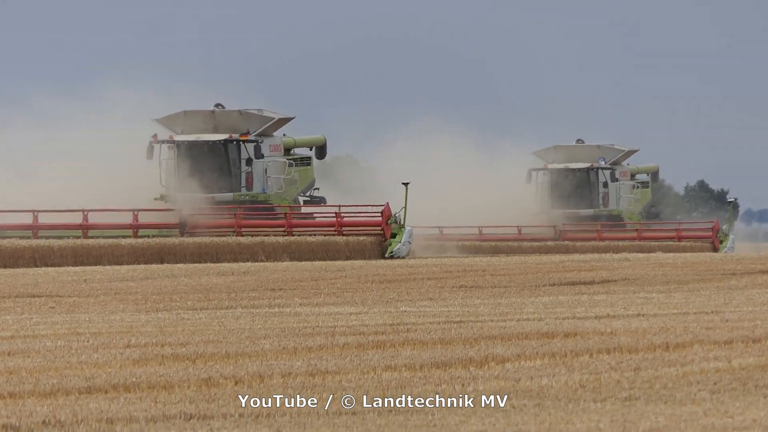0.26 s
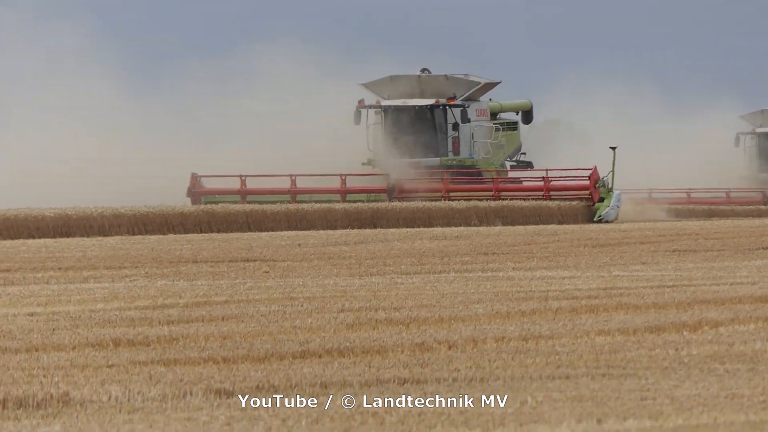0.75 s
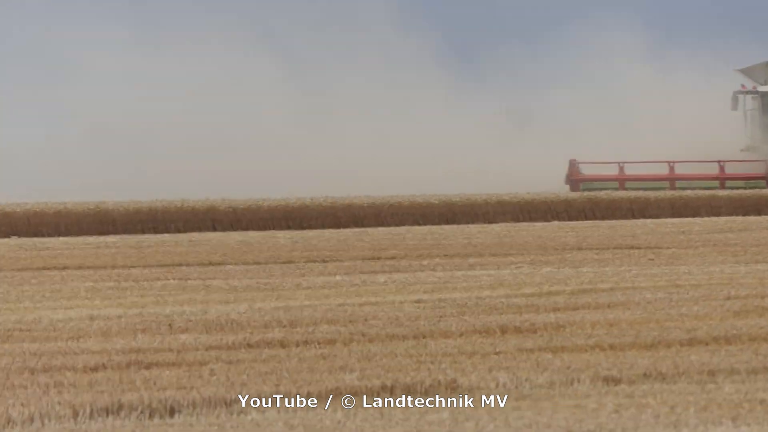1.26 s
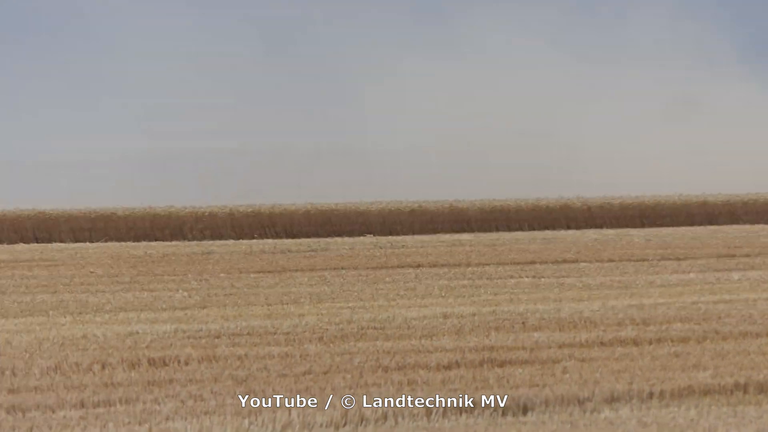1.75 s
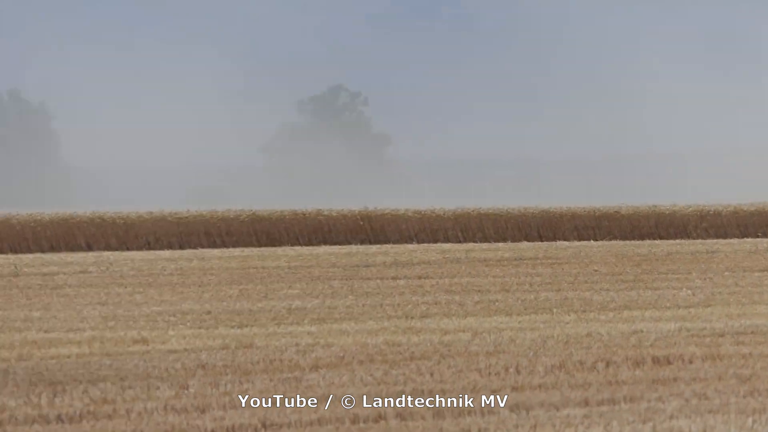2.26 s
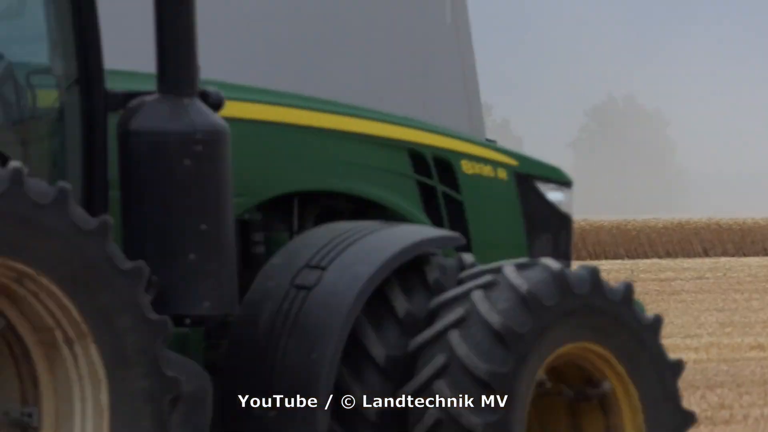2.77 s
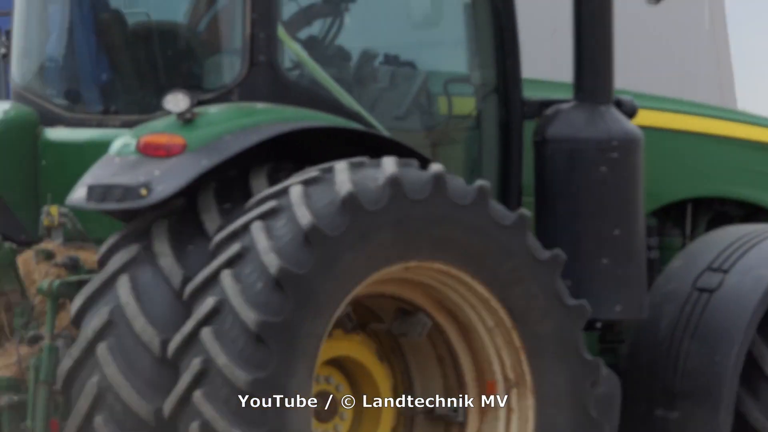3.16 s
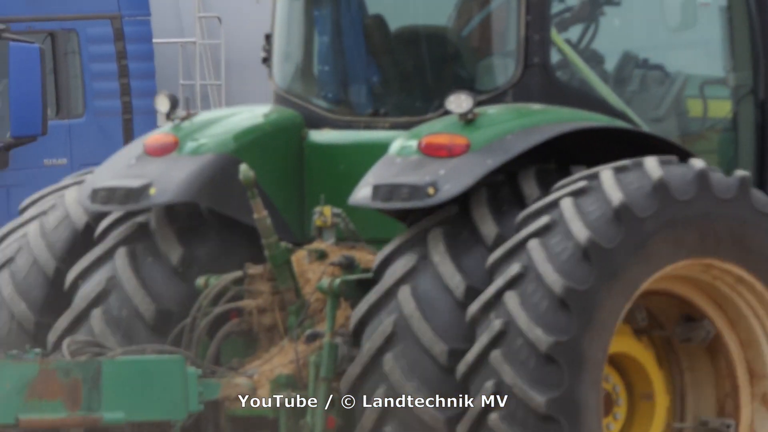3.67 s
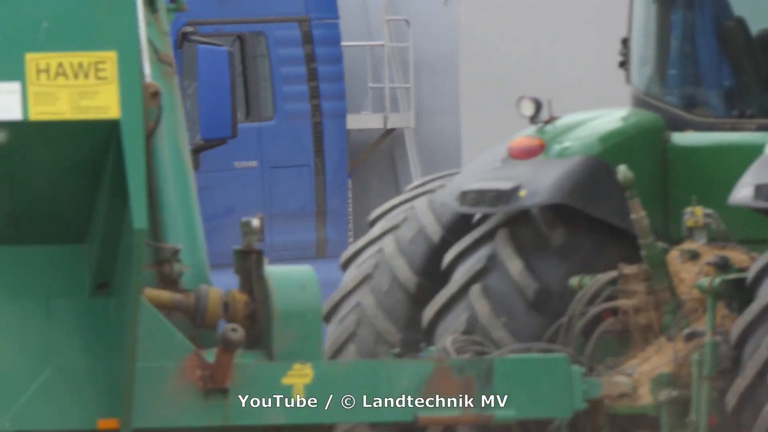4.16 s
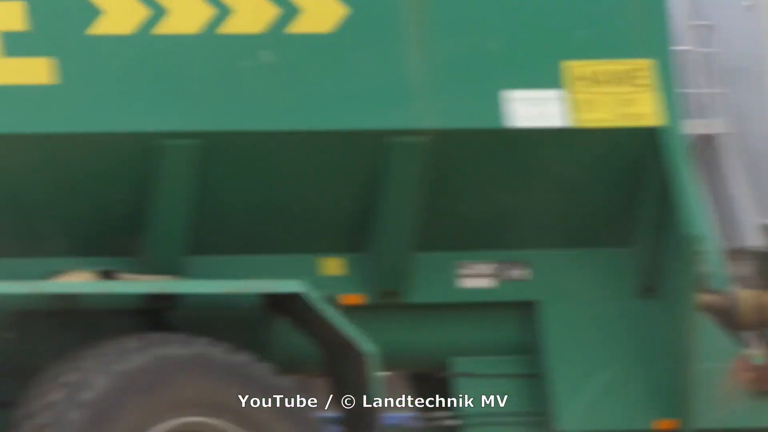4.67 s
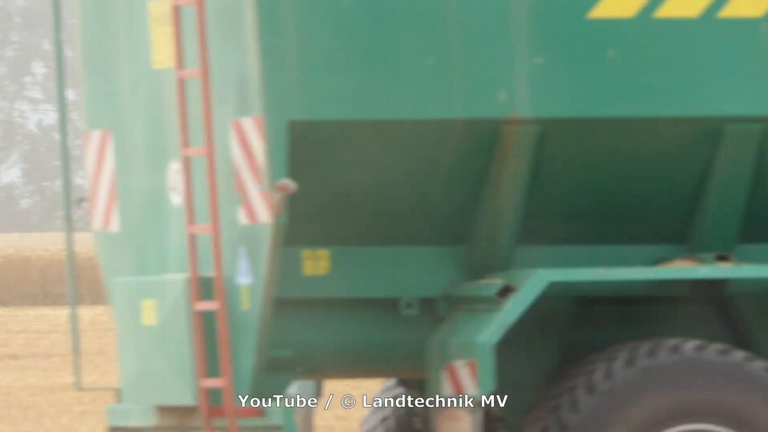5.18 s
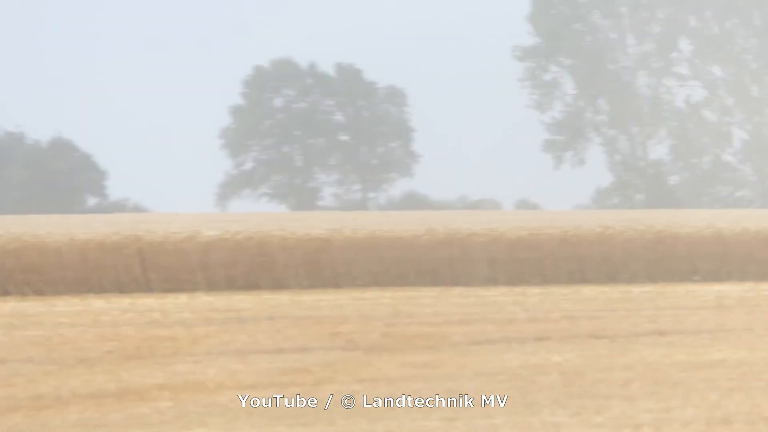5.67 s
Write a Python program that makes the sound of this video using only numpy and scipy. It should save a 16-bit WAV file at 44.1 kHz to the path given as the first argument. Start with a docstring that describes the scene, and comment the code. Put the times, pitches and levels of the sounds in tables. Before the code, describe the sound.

Wind thuds hard on a handheld microphone over a distant harvester wash, then a tractor and trailer roar past with whistle, rattle and a brief squeak.

```python
"""A windy crop field at harvest, from a handheld camera's microphone: a tractor and trailer draw near and pass.
The pass and the far harvesters are noise bands of fans and threshing; diesel firings ring an exhaust,
and drive tones, a high whistle and a gear whine are wavering oscillators. A bearing squeaks once, a small
steel part clinks twice, panels chatter, straw or dust swishes, and wind thuds right on the microphone.
Machine levels are as heard, with every dip already in their curves; record() adds fixed gain and rounding."""
import sys
import numpy as np
from scipy import signal
from scipy.fft import rfft, irfft, next_fast_len
from scipy.io import wavfile
from scipy.ndimage import uniform_filter1d

SR = 44100
rng = np.random.default_rng(int(sys.argv[2]) if len(sys.argv) > 2 else 0)


def unload_audio(sound):
    """Save the sound as a 16-bit wav file, at the path given as the first command line argument."""
    columns = np.transpose(np.atleast_2d(sound))
    # keep every value between -1 and 1, then stretch to whole-number steps
    steps = np.round(np.clip(columns, -1, 1) * 32767)
    wavfile.write(sys.argv[1], SR, steps.astype(np.int16))


N = 261513


def undb(db):
    """dB to gain."""
    return 10 ** (np.asarray(db) / 20)


def level(x, db):
    """Scale to an rms level in dB."""
    return x * undb(db) / np.sqrt(np.mean(x ** 2))


def curves(table):
    """Table columns joined by straight lines, one value a sample."""
    s, *columns = np.transpose(table)
    return [np.interp(np.arange(N) / SR, s, column) for column in columns]


def walk(rate):
    """Random levels held 1 / rate s and smoothed twice; spread near 1."""
    hold = int(SR / rate)
    steps = np.repeat(rng.standard_normal(N // hold + 1), hold)
    return 1.3 * uniform_filter1d(uniform_filter1d(steps, hold), hold)[:N]


def coloured(points):
    """Frequencies and random spectrum of a noise with a (Hz, dB) colour."""
    size = next_fast_len(N)
    hz = np.maximum(np.fft.rfftfreq(size, 1 / SR), 1)
    point_hz, point_db = np.array(points).T
    db = np.interp(np.log(hz), np.log(point_hz), point_db)
    return hz, rfft(rng.standard_normal(size)) * undb(db)


def noise(points):
    """Steady noise with a (Hz, dB) colour."""
    return irfft(coloured(points)[1])[:N]


def tone(hz):
    """Phase of an oscillator with a moving pitch."""
    return 2 * np.pi * np.cumsum(hz) / SR


def bumps(rows):
    """Bell-shaped swells from (s, peak dB, length s) rows; the length spans the 1/e points."""
    t = np.arange(N) / SR
    return sum(undb(db) * np.exp(-((t - s) / (length / 2)) ** 2) for s, db, length in rows)


# Tractor and trailer parts going by close to the microphone, in order: radiator grille, engine hood, cab, # big
# tyres in two rows, one for each of their two swells, then trailer body, trailer wheels. Each row: closest
# moment in seconds, # half-width in seconds, then peak level in dB of rumble, roar, drive noise, rattle, hiss
# and top air.
PASSES = [(3.15, 0.26, -34.5, -60, -35.5, -47, -48, -62), (3.65, 0.22, -38, -28.5, -35.5, -42.5, -54, -60),
          (4.1, 0.47, -35, -31, -32, -48, -47.5, -59), (4.5, 0.22, -37.5, -30.5, -29.5, -30, -36.5, -54.5),
          (4.82, 0.16, -37, -31.5, -37, -31.5, -36, -56), (5.15, 0.33, -33.5, -33, -27, -31.5, -40.5, -58),
          (5.7, 0.28, -40, -35.5, -33, -32.5, -38, -57)]
FALL_OFF = 1.57  # 1 is open air; steeper here, as each part is shaded by the others
# Far harvesters as heard: the level dips after the strongest gust, then recovers; the dip is in this curve.
# Each row: time in seconds, level in dB, extra level of the bass in dB, extra level of the treble in dB.
HARVESTERS = [(0, -33.5, -2, -2), (0.2, -32.5, 1, 1.5), (0.6, -34.5, 3, 1.5), (0.7, -33, -0.5, 3.5),
              (0.76, -29.5, -1, -2), (0.83, -32.5, 0.5, 1.5), (0.98, -34, 1, 1), (1.06, -32.5, 2.5, -1.5),
              (1.13, -34.5, -1.5, 1.5), (1.22, -38.5, -1, -1), (1.35, -37.5, -7, -0.5),
              (1.58, -36, -5.5, -1), (1.7, -38, 3, -2.5), (1.95, -39.5, 1.5, -0.5), (2.16, -37, 1.5, 1),
              (2.8, -39, 1, -0.5), (3.05, -37, 2, 0), (3.5, -36.5, 1, 3), (5.93, -34.5, 3.5, -4)]
# Far harvesters' rumble, roar, drive noise, threshing rattle, fan hiss and top air, in dB against their level.
HARVESTER_RANGES_DB = (1.5, -0.5, 1, -2.5, -10, -26.5)
# How much of the extra bass and of the extra treble reaches each of the six ranges, as a fraction.
BASS_SHARE = (0.7, 0.72, 0.19, 0.025, 0.24, 0.23)
TREBLE_SHARE = (0.13, 0.03, 0, 0.28, 0.82, 0.17)


def range_levels():
    """Level of each range in dB: far harvesters plus parts passing, whose power falls with distance."""
    t = np.arange(N) / SR
    db, bass_db, treble_db = curves(HARVESTERS)
    far_db = db + np.array(HARVESTER_RANGES_DB)[:, None]
    far_db = far_db + np.outer(BASS_SHARE, bass_db) + np.outer(TREBLE_SHARE, treble_db)
    power = undb(far_db) ** 2
    for s, half, *part_db in PASSES:
        distance_squared = 1 + ((t - s) / half) ** 2  # 1 at the closest
        power = power + undb(part_db)[:, None] ** 2 / distance_squared ** FALL_OFF
    return 10 * np.log10(power)


# Plain colour of the fans and threshing. Each row: frequency in Hz, relative density in dB.
WASH_COLOUR = [(60, 12.5), (120, 9), (250, -2), (310, -0.5), (370, -4.5), (520, 1), (610, -4), (720, 0),
               (1250, 3), (2100, -3.5), (2400, -6), (3200, -9), (3620, -12), (3850, -10.5), (4000, -13),
               (4700, -19), (6500, -23.5), (9100, -23), (10000, -30), (15500, -36.5)]
# Six ranges from rumble up to top air. Each row: lowest and highest frequency in Hz.
RANGES_HZ = ((130, 400), (400, 900), (900, 2000), (2000, 4500), (4500, 8800), (10000, 12300))


def wash(range_db, surge_db=0.41, flicker_db=1.22, sway_db=.5):
    """Half-octave bands of fan and threshing noise; all surge with the crop flow, each sways, the treble flickers."""
    hz, spectrum = coloured(WASH_COLOUR)
    # how far each range has to move from the plain colour
    gain_db = []
    for db, (low, high) in zip(range_db, RANGES_HZ):
        plain = irfft(spectrum * ((hz > low) & (hz < high)))
        gain_db.append(db - 20 * np.log10(plain.std()))
    # a range is flat inside and blends at its edges
    knots = (np.log(RANGES_HZ) + [.15, -.15]).clip(None, np.log(11000)).ravel()
    out, surge = 0, walk(11)
    for centre in 44 * 2 ** np.arange(0, 9, .5):
        window = np.clip(1 - 2 * np.abs(np.log2(hz / centre)), 0, 1)
        band = irfft(spectrum * window)[:N]
        shares = [np.interp(np.log(centre), knots, np.repeat(row, 2)) for row in np.eye(len(RANGES_HZ))]
        bright = min(centre / 5000, 1)
        db = sum(share * gain for share, gain in zip(shares, gain_db) if share)
        db = db + surge_db * surge + sway_db * walk(15) + bright * flicker_db * walk(12)
        out = out + band * undb(db)
    return out


CYCLE_HZ = 21.76  # one firing of every cylinder
# The tractor's six cylinders in firing order: relative strength in dB.
CYLINDER_DB = (5.5, -29.5, -2, -18, 3, -4)
# Exhaust resonances. Each row: frequency in Hz, width in Hz, relative level in dB.
EXHAUST = [(65, 27, -25), (109, 27, 16.5), (168, 30, -25)]


def engine(scatter_db=6.0, drift=.004):
    """Six uneven firings a cycle ring the exhaust; returned at an rms of 1."""
    count = np.cumsum(6 * CYCLE_HZ * (1 + drift * walk(2))) / SR
    at = np.flatnonzero(np.diff(np.floor(count)))
    pulses = np.zeros(N)
    pulses[at] = undb(np.resize(CYLINDER_DB, len(at)) + scatter_db * rng.standard_normal(len(at)))
    pipe = 0
    for hz, width, db in EXHAUST:
        pipe = pipe + undb(db) * signal.lfilter(*signal.iirpeak(hz, hz / width, fs=SR), pulses)
    return level(pipe, 0)


# Drive tones under the roar. Each row: pitch in Hz, level in dB against the roar, waver in Hz.
TONES = [(549, -17, 14), (586, -17.5, 5.58), (652, -17, 6.07), (1145, -16, 13.97), (1299, -17.5, 13.95),
         (1647, -31, 9.3), (2560, -22, 7.9)]


def drive_tones():
    """Gear and pump tones that waver and fade on the way through moving air."""
    out = 0
    for hz, db, waver in TONES:
        fading = np.sqrt(2) * undb(db + 4 * walk(16))
        out = out + fading * np.sin(tone(hz + waver * walk(30)))
    return out


HUM_HZ = 290.8
# The clearest drive tone. Each row: time in seconds, level in dB.
HUM = [(0.0, -42), (0.4, -47), (1.6, -52), (2.4, -55), (3.6, -36), (4.0, -39.5), (4.4, -46.5), (4.8, -36.5),
       (5.93, -56)]


def hum(waver_hz=3., fade_db=4.):
    """A pump or gear tone, rough and broken."""
    fading = undb(curves(HUM)[0] + fade_db * walk(18))
    return np.sqrt(2) * fading * np.sin(tone(HUM_HZ + waver_hz * walk(21.99)))


# High whistle, likely a turbocharger. Each row: time in seconds, pitch in Hz, level in dB.
WHISTLE = [(0, 9350, -51.5), (1, 9355, -53), (1.2, 9365, -60), (1.5, 9380, -57), (1.9, 9390, -57),
           (2.4, 9350, -59), (2.9, 9310, -55), (3.35, 9280, -47), (3.8, 9280, -46.5), (4.1, 9340, -49),
           (4.38, 9290, -41.5), (4.5, 9275, -48), (4.62, 9275, -39), (4.74, 9270, -42), (4.88, 9262, -37),
           (4.94, 9260, -43), (5.12, 9270, -40), (5.3, 9270, -53), (5.55, 9270, -44), (5.7, 9245, -50),
           (5.93, 9240, -41)]
# Throb of the whistle, deeper when near. Each row: time in seconds, depth as a factor.
THROB = [(0, .3), (2.8, .3), (3.3, .7), (5.93, .7)]


def whistle(fade_db=3., waver_hz=12, flutter_db=1.5):
    """The whistle throbs once and twice a crank turn, more when near, and flutters in the turbulent air."""
    (hz, db), (depth,) = curves(WHISTLE), curves(THROB)
    crank = tone(2 * CYCLE_HZ * (1 + .06 * walk(15)))  # two turns a cycle
    once, twice = .6 * undb(2 * walk(14)), .75 * undb(2.5 * walk(14))
    throb = 1 + depth * (once * np.cos(crank) + twice * np.cos(2 * crank + walk(19)))
    sway = 0.53 * walk(8.8) * np.sin(crank)  # the pitch also rocks with the crank, so the side tones are uneven
    air = undb(fade_db * walk(40) + flutter_db * walk(14))
    carrier = np.sin(tone(hz + waver_hz * walk(70)) + sway)
    return level(throb * air * carrier, 0) * undb(db)


# Faint gear whine. Each row: time in seconds, pitch in Hz, level in dB.
WHINE = [(3.3, 2060, -56), (3.5, 2030, -40.5), (3.65, 2030, -58), (3.8, 2020, -40), (4.0, 1965, -45),
         (4.12, 1974, -39.5), (4.6, 2000, -55), (5.2, 2010, -38), (5.27, 2090, -41)]


def whine():
    """A thin gear tone that sags and recovers with the load."""
    hz, db = curves([(3.2, 2030, -90)] + WHINE + [(5.3, 2060, -90)])  # rises from and sinks to silence
    return np.sqrt(2) * undb(db) * np.sin(tone(hz + 4 * walk(29.9)))


def chatter(count=140, low_hz=453.0, high_hz=2799.0, spread_db=2.0):
    """Panels, chains and belts sing short wavering partials at random; returned at an rms of 1."""
    out = np.zeros(N + SR)
    for when, pitch, span, bend, size in rng.random((count, 5)):
        n = int(SR * (0.055 + 0.22 * span))
        glide = 1 + 0.035 * (bend - .5) * np.linspace(-1, 1, n)
        hz = low_hz * (high_hz / low_hz) ** pitch * glide
        gain = undb(2 * spread_db * size - 6 * pitch)  # higher partials are weaker
        out[int(when * N):][:n] += gain * np.hanning(n) * np.sin(tone(hz))
    return level(out[:N], 0)


# Housings and sieves that sing out of the wash for a while. Each row: middle in seconds, peak level in dB,
# length in seconds, centre in Hz, width in Hz.
SINGING = [(0.45, -54, .2, 3900, 150), (0.68, -51, .35, 3900, 200), (0.75, -41, .3, 1340, 150),
           (0.97, -43, .35, 2100, 90), (0.1, -50, .5, 3400, 400), (1.59, -44, .12, 2300, 900),
           (1.7, -52, .8, 2030, 100), (2.6, -51, .8, 2030, 100), (2.2, -46, 0.58, 1210, 200),
           (3.25, -39.5, .6, 1177, 200), (3.4, -54, .8, 3790, 150), (3.3, -51, .8, 2590, 150),
           (4.5, -43, .3, 2550, 200), (4.65, -42, .5, 3100, 500), (4.6, -46, .5, 3550, 400)]


def singing():
    """Narrow bands of noise that swell and fade, as housings and sieves resonate."""
    out = 0
    for s, db, length, hz, width in SINGING:
        skirts = [(hz - width, -40), (hz - width / 2, -6), (hz, 0), (hz + width / 2, -6), (hz + width, -40)]
        band = signal.lfilter(*signal.iirpeak(hz, hz / width, fs=SR), noise(skirts))
        out = out + level(band, 0) * bumps([(s, db, length)])
    return out


# Slips of a dry bearing. Each row: middle in seconds, pitch in Hz, peak level in dB, length in seconds.
SQUEAK = [(5.280, 2140, -33, .008), (5.289, 2165, -30, .009), (5.300, 2120, -25, .010),
          (5.313, 2145, -25, .009), (5.324, 2150, -33, .007), (5.349, 2140, -30, .010)]
# The squeak's fundamental and overtones, in dB against each slip.
SQUEAK_ORDERS_DB = (5, -2.5, -13, -15)
OVERTONE_PEAK_S, OVERTONE_SINK_DB_PER_S = 5.298, 250  # overtones are strongest here and sink on either side


def squeak(jitter_hz=10, slip_db=1.2):
    """Stick-slip in a dry bearing: a short rough tone; each overtone breaks up on its own."""
    phase = tone(curves(SQUEAK)[0] + jitter_hz * walk(300))
    slips = bumps([(s, db, length) for s, _, db, length in SQUEAK])
    dull_db = -OVERTONE_SINK_DB_PER_S * np.abs(np.arange(N) / SR - OVERTONE_PEAK_S)
    out = 0
    for k, order_db in enumerate(SQUEAK_ORDERS_DB):
        db = order_db + (k > 0) * dull_db + slip_db * walk(200)
        out = out + np.sqrt(2) * undb(db) * np.sin((k + 1) * phase)
    return slips * out


# Knocks on a small steel part, the first a close pair. Each row: start in seconds, strength in dB.
CLINKS = [(2.216, -47), (2.222, -44), (4.299, -50)]
# Its ringing modes. Each row: pitch in Hz, level in dB against the knock, time to fall 60 dB in seconds.
CLINK_MODES = [(7970, 1, 0.085), (9650, 6, .025), (12000, 1, .09), (13600, -10, .05), (15340, -6, .1)]


def clinks():
    """A small steel part, knocked, rings in its high modes."""
    t = np.arange(SR // 5) / SR
    ring = sum(undb(db - 60 * t / t60) * np.sin(2 * np.pi * hz * t) for hz, db, t60 in CLINK_MODES)
    blows = np.zeros(N)
    for s, db in CLINKS:
        blows[int(s * SR)] = undb(db)
    return signal.fftconvolve(blows, ring)[:N]


# Brief swishes of straw or dust. Each row: middle in seconds, peak level in dB, length in seconds.
SWISHES = [(0.792, -36.5, .06), (1.072, -43, 0.055), (1.59, -45.5, 0.078), (2.99, -52, .06),
           (4.27, -40, .06), (4.85, -41, 0.1), (5.66, -39, 0.049)]
# Colour of a swish. Each row: frequency in Hz, relative density in dB.
SWISH_COLOUR = [(1500, -30), (3000, 7), (6500, 3), (9000, -23), (14000, -30)]


def swishes():
    """Short soft bursts of bright noise."""
    return level(noise(SWISH_COLOUR), 0) * bumps(SWISHES)


# A grainy thin fizz high in the treble. Each row: time in seconds, level in dB.
FIZZ = [(0, -68), (.4, -68), (.55, -59), (1.3, -71), (4.2, -65), (4.36, -68), (4.6, -70.5), (5.6, -62),
        (5.93, -62)]
# Colour of the fizz. Each row: frequency in Hz, relative density in dB.
FIZZ_COLOUR = [(12300, -60), (12500, 0), (12750, 0), (12950, -60)]


def fizz(patchy_db=4.):
    """Narrow noise that comes in broken patches."""
    patches = noise(FIZZ_COLOUR) * undb(patchy_db * walk(29.9))
    return level(patches, 0) * undb(curves(FIZZ)[0])


# Underlying buffet on the microphone, slowly changing and randomly swaying.
# Each row: time in seconds, level in dB before the sway.
WIND = [(0, -16), (1.0, -18), (1.3, -15.5), (2.3, -13), (3.0, -21.5), (4.0, -20), (5.0, -18), (5.93, -17)]
# Colour of the buffet. Each row: frequency in Hz, relative density in dB.
WIND_COLOUR = [(2, -2.5), (6, 1.5), (16, 4.5), (27, -1), (45, -6.5), (86, -27.5), (150, -32.5), (300, -78)]
# Strongest thuds on the microphone. Each row: middle in seconds, peak level in dB, length in seconds.
GUSTS = [(0.04, -17, 0.15), (0.23, -11, 0.064), (0.32, -8.5, .05), (0.49, -3.5, 0.037), (0.565, -7, 0.029),
         (0.74, -10, 0.15), (0.89, -11, 0.11), (1.13, -2.5, 0.16), (1.27, -5, 0.061), (1.35, -9, 0.057),
         (1.42, -10.5, 0.12), (1.62, -8, 0.057), (1.84, -7, 0.12), (1.99, -8.5, 0.089), (2.12, -17, 0.088),
         (2.27, -6, 0.073), (2.43, -10, 0.088), (2.57, -10, 0.077), (2.76, -8, 0.032), (2.825, -15, 0.027),
         (3.01, -11.5, 0.04), (3.2, -16.5, 0.044), (3.43, -13, 0.11), (3.64, -17.5, 0.11), (3.81, -13, .07),
         (3.95, -12, 0.093), (4.13, -10, 0.08), (4.44, -16, 0.06), (5.09, -8.5, 0.055), (5.3, -7, 0.021),
         (5.43, -11, .07), (5.53, -11, .04)]
GUST_DEEPENS = .1  # exponent: stronger gusts shift weight from thuds to slow drift
GUST_CEILING = 1.25  # the pressure of a gust at the microphone levels off here


def wind(even=0.8, gusty_db=2., heard_hz=20):
    """Slow pressure drift and heard thuds; each swell is evened out so that random and strong gusts carry it."""
    hz, spectrum = coloured(WIND_COLOUR)
    parts = []
    for part in (hz < heard_hz, hz >= heard_hz):
        thud = irfft(spectrum * part)[:N]
        swell = uniform_filter1d(thud ** 2, size=SR // 12) / np.mean(thud ** 2)
        parts.append(thud / swell ** (even / 2))
    drift, thuds = parts
    buffet = undb(curves(WIND)[0] + gusty_db * walk(22))
    force = np.hypot(buffet, bumps(GUSTS))
    deeper = (force / undb(-15)) ** GUST_DEEPENS
    pressure = (drift * deeper + thuds / deeper) * force / np.std(drift + thuds)
    return GUST_CEILING * np.tanh(pressure / GUST_CEILING)


def scene():
    """Machines, their small noises and the wind, in one channel."""
    ranges = range_levels()
    rumble_db, roar_db, drive_db = ranges[:3]
    machines = wash(ranges) + undb(rumble_db - 10.0) * engine()
    machines = machines + undb(roar_db) * drive_tones() + undb(drive_db - 9.0) * chatter()
    tones = hum() + whistle() + whine() + squeak() + clinks()
    noises = singing() + swishes() + fizz()
    return (machines + tones + noises + wind())[None]


TOP_HZ = 15720


def record(dry):
    """The camera blocks the slowest pressure drift, rounds the strongest thuds and cuts the top."""
    dry = signal.sosfilt(signal.butter(1, 2, "high", fs=SR, output="sos"), dry)
    rounded = np.tanh(0.66 * dry) / 0.75
    return signal.sosfilt(signal.ellip(16, .2, 90, TOP_HZ, fs=SR, output="sos"), rounded)


dry = scene()
out = record(dry)
unload_audio(out)
```